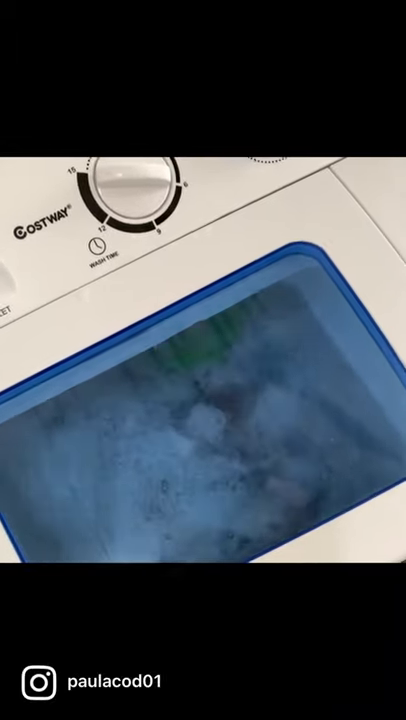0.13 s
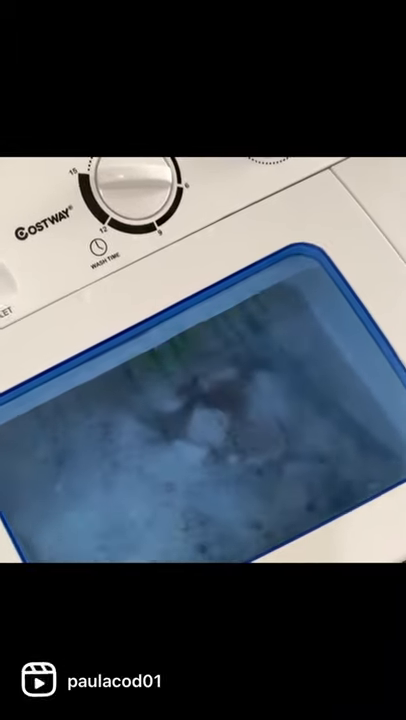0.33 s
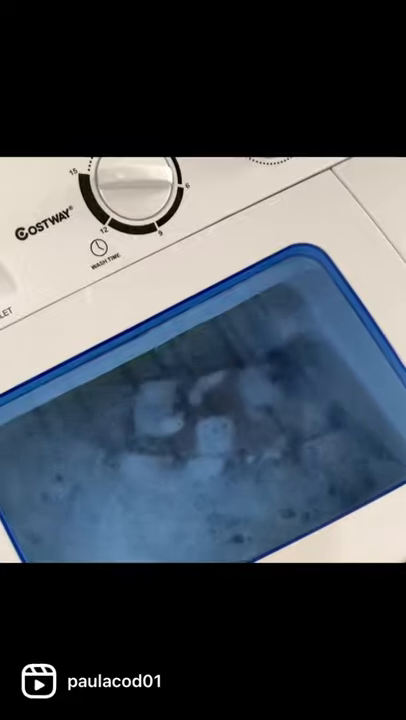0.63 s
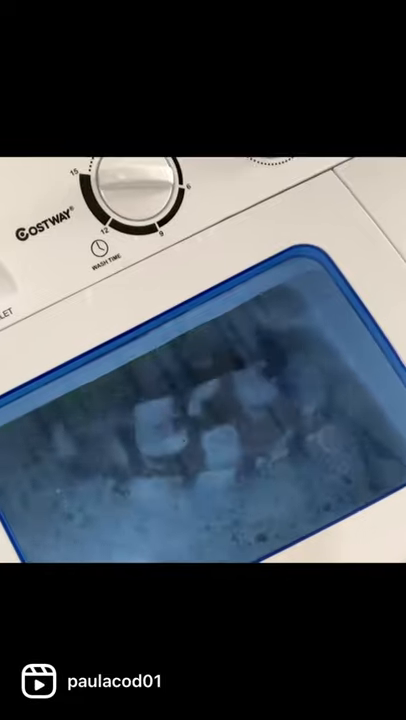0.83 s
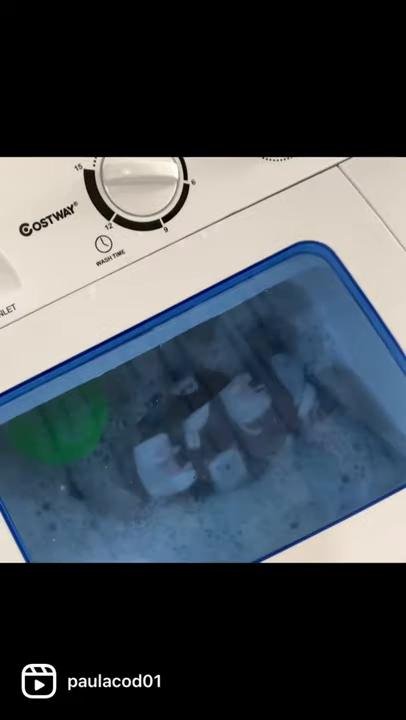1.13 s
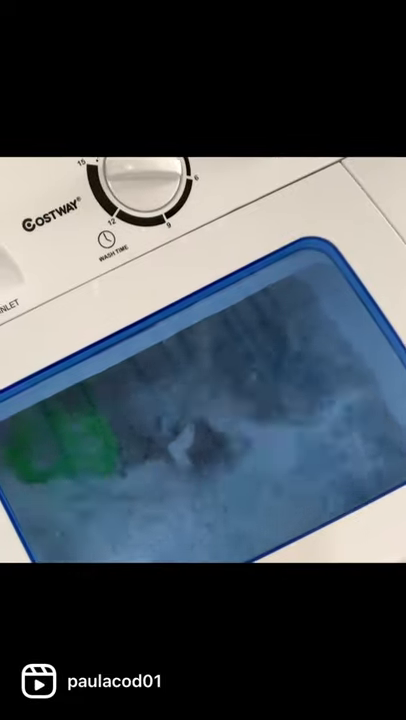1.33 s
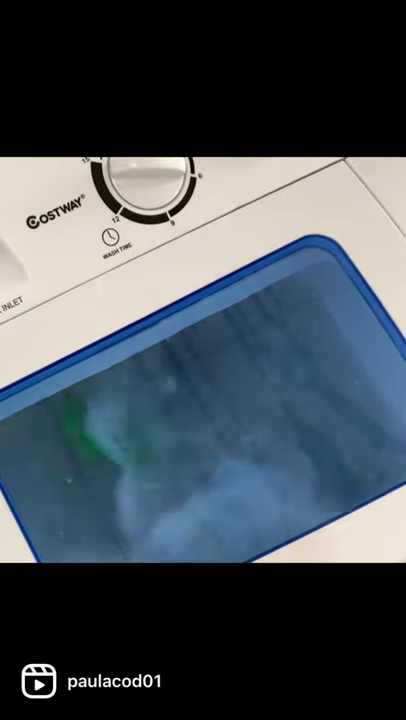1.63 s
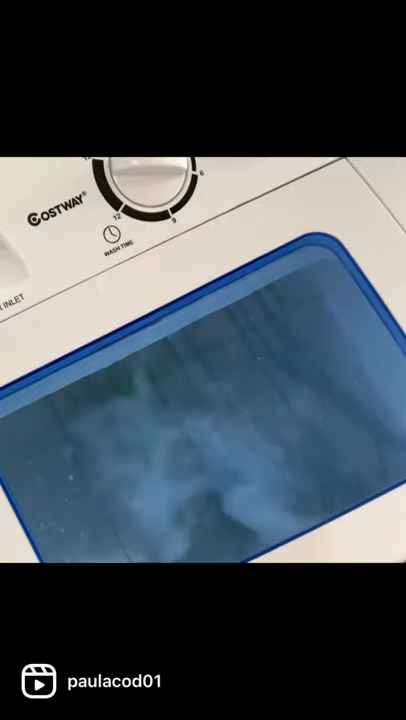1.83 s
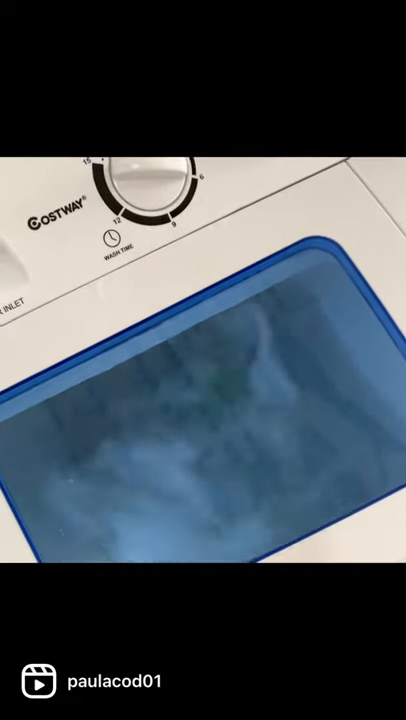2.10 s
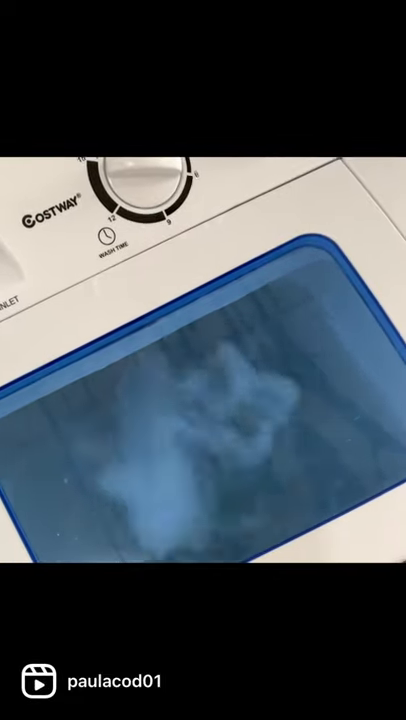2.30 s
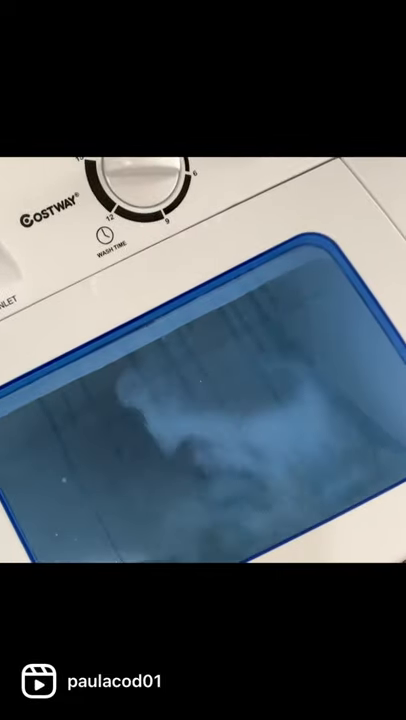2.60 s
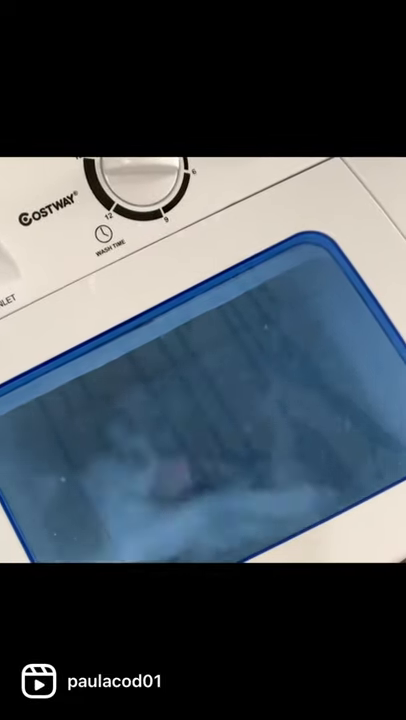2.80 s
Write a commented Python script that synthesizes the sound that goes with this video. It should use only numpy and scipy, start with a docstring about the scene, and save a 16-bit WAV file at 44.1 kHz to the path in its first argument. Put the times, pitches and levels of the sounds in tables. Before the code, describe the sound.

A small plastic washing machine: its timer ticks rapidly over quiet water, a switch snaps, the motor spins up into a rough low hum, and laundry churns with dull thumps; close stereo microphones in a quiet room.

```python
"""A small plastic washing machine heard from just above its lid, in a quiet room, by two close microphones.
At first the clockwork timer ticks over idle water and a few bubbles and drops. At 0.68 s its switch snaps
and the motor spins up: mains hum, rough shaft tones and cabinet rumble. Then water churns and sprays as
filtered noise, laundry bumps the tub's decaying modes, and drops and rising bubble tones thicken late,
with a second snap at 2.66 s."""
import sys
import numpy as np
from scipy import signal
from scipy.fft import rfft, irfft
from scipy.io import wavfile
from scipy.ndimage import uniform_filter1d

SR = 44100
rng = np.random.default_rng(int(sys.argv[2]) if len(sys.argv) > 2 else 0)


def dump_mix(stems):
    """Bounce the given channels to the path in sys.argv[1] as a 16-bit WAV at rate SR."""
    frames = np.atleast_2d(stems).T  # one column per channel
    limited = np.clip(frames, -1, 1)  # hard clip at full scale
    pcm = np.round(limited * 32767).astype(np.int16)
    wavfile.write(sys.argv[1], SR, pcm)


N = 130095
SWITCH_ON_S = .68


def undb(db):
    """Decibel law: amplitude gain of a level in dB."""
    return 10 ** (np.asarray(db) / 20)


def level(x, db):
    """Root-mean-square normalisation: scale to an rms level in dB."""
    return x * undb(db) / np.sqrt(np.mean(x ** 2))


def curve(table):
    """Linear interpolation in time: a (time [s], value) table at every sample."""
    return np.interp(np.arange(N) / SR, *np.array(table).T)


def over_hz(table, hz):
    """Interpolation on a logarithmic frequency axis: a (frequency [Hz], value) table."""
    table_hz, values = np.array(table).T
    return np.interp(np.log(hz + 1), np.log(table_hz), values)


def walk(rate):
    """Smoothed random modulation: values held 1 / rate s and slewed twice; spread near 1."""
    hold = int(SR / rate)
    steps = np.repeat(rng.standard_normal(N // hold + 1), hold)
    return 1.25 * uniform_filter1d(uniform_filter1d(steps, hold), hold)[:N]


# likeness of the two microphones: (frequency [Hz], likeness [0-1])
MIC_LIKENESS = [(100, .92), (220, .94), (400, .6), (1400, .2), (6500, .3), (7800, .88), (16000, .86)]
# left minus right: (frequency [Hz], level difference [dB])
MIC_TILT = [(30, -2), (60, -1), (130, -2.5), (250, 1.5), (550, 2), (1500, 2.5), (3000, 0.5), (5500, -1),
            (7500, -1)]
# phase by which the left microphone leads: (frequency [Hz], lead [cycles])
MIC_LEFT_LEAD = [(500, 0), (1000, .2), (2000, .5), (3500, .85), (4200, 1), (6500, 1), (8300, .5),
                 (11000, 0), (13400, -.5), (15400, -1)]


def ports(x, other):
    """Partial coherence: two microphones share x by likeness and 'other' fills the rest."""
    hz = np.arange(N // 2 + 1) * SR / N
    like = np.clip(over_hz(MIC_LIKENESS, hz), 0, 1)
    mid = rfft(x) * np.sqrt((1 + like) / 2)
    side = rfft(other) * np.sqrt((1 - like) / 2)
    # half the level and phase difference goes to each side
    lead = np.interp(hz, *np.array(MIC_LEFT_LEAD).T)
    left = undb(over_hz(MIC_TILT, hz) / 2) * np.exp(1j * np.pi * lead)
    return np.array([irfft((mid + side) * left, N), irfft((mid - side) / left, N)])


def wash(colour, source, flicker_db, rate):
    """Subtractive synthesis: two sources coloured, half-octave bands flickering partly alone; rms 1."""
    hz = np.arange(N // 2 + 1) * SR / N
    low, high = colour[0][0], colour[-1][0]
    inside = (hz > low) & (hz < high)
    both = rfft(source) * undb(over_hz(colour, hz)) * inside
    place = 2 * np.log2(hz + 1)  # in half octaves
    together = walk(rate)
    out = 0
    for k in range(int(2 * np.log2(low)), int(2 * np.log2(high)) + 2):
        share = np.sqrt(np.clip(1 - abs(place - k), 0, 1))
        flicker = undb(flicker_db * (walk(rate) + 1.43 * together))
        out = out + irfft(both * share, N) * flicker
    return level(ports(*out), 0)


def ring(modes, push):
    """Modal synthesis: decaying modes, t60 at most 0.12 s, driven by a push; peak 1."""
    t = np.arange(SR // 5) / SR
    response = 0
    for hz, db, t60 in modes:
        response = response + undb(db) * np.sin(2 * np.pi * hz * t) * 1000. ** (-t / min(t60, .12))
    x = signal.fftconvolve(response, push)
    return x / abs(x).max()


def add(out, x, s):
    """Superposition: mix a sound in at s seconds."""
    i = int(s * SR)
    if 0 <= i < N:
        out[i:i + len(x)] += x[:N - i]


# mains hum: (multiple of the base tone, rms level once built up [dB])
HUM_TONES = [(1, -30), (2, -39.5), (3, -46)]
HUM_HZ = 120.07
HUM_WAVER_DB = .38  # times the multiple
HUM_RISE_S, HUM_LATE_SHARE, HUM_LATE_S = .04, .7, .13


def mains_hum():
    """Harmonic series: a fixed base tone and multiples; a share of the hum builds up late."""
    t = np.arange(N) / SR
    since_on = np.clip(t - SWITCH_ON_S, 0, 9)
    hum = 0
    for k, db in HUM_TONES:
        gain = undb(db + HUM_WAVER_DB * k * walk(22))
        hum = hum + gain * np.sin(2 * np.pi * (k * HUM_HZ * t + rng.random()))
    rise = 1 - np.exp(-(since_on / HUM_RISE_S) ** 2 / 2)
    late = 1 - HUM_LATE_SHARE * np.exp(-since_on / HUM_LATE_S)
    return np.sqrt(2) * hum * rise * late


# shaft tones: (multiple of shaft speed, rms level before the load [dB])
SHAFT_TONES = [(6, -40), (7, -39), (8, -35.5), (9, -45), (10, -43), (12, -46.5), (18, -54.5)]
SHAFT_HZ, SPIN_UP_S = 28.05, .07  # running speed, time constant of spin-up
SHAFT_DRIFT = .003  # fraction of speed
SHAFT_ROUGH_DB, SHAFT_ROUGH_PER_S = 4, 24


def shaft_tones():
    """Rotational orders: tones locked to a shaft that spins up exponentially, rough in level and phase."""
    since_on = np.clip(np.arange(N) / SR - SWITCH_ON_S, 0, 9)
    speed = SHAFT_HZ * (1 - np.exp(-since_on / SPIN_UP_S)) * (1 + SHAFT_DRIFT * walk(2.97))
    turn = 2 * np.pi * np.cumsum(speed) / SR
    tones = 0
    for k, db in SHAFT_TONES:
        gain = undb(db + SHAFT_ROUGH_DB * walk(SHAFT_ROUGH_PER_S))
        tones = tones + gain * np.sin(k * turn + 0.76 * walk(16) + 7 * rng.random())
    return np.sqrt(2) * tones


# cabinet rumble: (frequency [Hz], relative level [dB per Hz])
RUMBLE_COLOUR = [(40, -17.5), (60, -29), (90, -9.5), (125, -6), (155, -7), (170, -2.5), (185, -4),
                 (230, -4), (310, -8.5), (445, -18), (515, -12.5), (700, -36)]
RUMBLE_DB = -31  # before the growl and the load
GROWL_DB, GROWL_PEAK_S, GROWL_WIDTH_S = 5.5, .812, .16


def cabinet_rumble():
    """Resonant filtering: noise in the cabinet's colour, growling as the motor strains at the start."""
    t = np.arange(N) / SR
    growl_db = GROWL_DB * np.exp(-((t - GROWL_PEAK_S) / GROWL_WIDTH_S) ** 2)
    return undb(RUMBLE_DB + growl_db) * wash(RUMBLE_COLOUR, rng.standard_normal((2, N)), 1.5, 7.91)


# motor load after switch-on: (time [s], level [dB])
MOTOR_LOAD = [(.68, -42), (.72, -14.5), (.78, -7), (.86, -2.5), (.96, 0), (1.25, 0.5), (1.5, -0.5),
              (1.65, -0.5), (2.0, -1), (2.3, -0.5), (2.6, -2.5), (2.95, 3)]


def motor():
    """Amplitude modulation by load: it scales shaft tones and rumble, while the hum stands apart."""
    load = undb(curve(MOTOR_LOAD))
    tones = mains_hum() + shaft_tones() * load
    running = np.arange(N) / SR > SWITCH_ON_S
    return (ports(tones, np.roll(tones, 90)) + cabinet_rumble() * load) * running


# colour of churning water: (frequency [Hz], relative level [dB per Hz])
CHURN_COLOUR = [(260, -33), (450, -10), (511, -9), (673, -14.5), (746, -5), (2800, -16), (3150, -22),
                (4600, -26), (7000, -38.5), (9100, -69), (15400, -120)]
# churning: (time [s], level [dB])
CHURN_LEVELS = [(0.7, -51), (.82, -46), (0.93, -41), (1.1, -43), (1.56, -44.5), (1.66, -41.5), (1.76, -47),
                (1.82, -42.5), (1.9, -44), (2.05, -50), (2.09, -40.5), (2.31, -44), (2.48, -40),
                (2.55, -44), (2.68, -41), (2.95, -42)]


def churn():
    """Turbulence noise: coloured, flickering noise that swells with the churning."""
    return wash(CHURN_COLOUR, rng.standard_normal((2, N)), 1.2, 29.94) * undb(curve(CHURN_LEVELS))


# colour of the spray: (frequency [Hz], relative level [dB per Hz])
SPRAY_COLOUR = [(2500, -18.5), (4500, 5.5), (7000, -0.5), (10000, -0.5), (13000, 0), (14500, -11.5),
                (16000, -27.5)]
# spray: (time [s], level [dB])
SPRAY_LEVELS = [(0.75, -74.5), (0.87, -64.5), (1.1, -64.5), (1.41, -77), (2.07, -65), (2.24, -65),
                (2.47, -58.5), (2.63, -58), (2.81, -53), (2.95, -57.5)]
GRAINS_PER_S, GRAIN_SPREAD_DB = 900, 4


def spray():
    """Shot noise: hiss made grainy by random brief swells over a steady part."""
    size = undb(GRAIN_SPREAD_DB * np.minimum(rng.exponential(size=N), 3))
    grains = (rng.random(N) < GRAINS_PER_S / SR) * size
    grains = uniform_filter1d(grains, size=40)
    fizz = rng.standard_normal((2, N)) * (grains / grains.std() + 1.3)
    return wash(SPRAY_COLOUR, fizz, 0.72, 5.7) * undb(curve(SPRAY_LEVELS))


BURBLE_PER_S, BURBLE_LOW_HZ, BURBLE_HIGH_HZ = 140, 540.8, 4680  # starting pitches
BURBLE_CYCLES = 15.1  # amplitude decays by exp(-2) in this many
BURBLE_DB, BURBLE_IDLE_DB = -8.5, -58  # against the churn; always present


def burble():
    """Bubble resonance: many small rising, fading tones at random, the low ones louder; rms 1."""
    out, t = np.zeros(N), np.arange(SR // 12) / SR
    for s, place, size in rng.random((int(BURBLE_PER_S * N / SR), 3)):
        hz = BURBLE_LOW_HZ * (BURBLE_HIGH_HZ / BURBLE_LOW_HZ) ** place
        fade = t * hz / BURBLE_CYCLES
        tone = np.sin(2 * np.pi * hz * t * (1 + 0.047 * fade))
        envelope = np.minimum(t * hz / 2, 1) * np.exp(-2 * fade)
        add(out, size ** 2 / hz * tone * envelope, s * N / SR)
    return level(ports(out, np.roll(out, 70)), 0)


def water():
    """Superposition of water sounds: idle lapping and faint burble, then churn, spray and more burble."""
    on = np.clip((np.arange(N) / SR - SWITCH_ON_S) / 0.038, 0, 1)
    burble_gain = undb(BURBLE_IDLE_DB) + on * undb(curve(CHURN_LEVELS) + BURBLE_DB)
    return idle() + on * (churn() + spray()) + burble() * burble_gain


# laundry bumping the tub: (time [s], peak level [dB])
TUB_BUMPS = [(0.931, -17), (1.185, -24.5), (1.221, -19.5), (1.61, -17.5), (2.242, -23), (2.54, -19),
             (2.864, -21)]
# ring of the tub: (frequency [Hz], level [dB], t60 [s])
TUB_MODES = [(130, -6.5, 0.3), (158.7, -2.5, 0.19), (221.2, 7, 0.27), (317, 2, .07), (369, -12, 0.017)]


def bumps():
    """Impact excitation: a smooth brief push sets the tub's modes ringing."""
    out = np.zeros(N)
    for s, db in TUB_BUMPS:
        add(out, undb(db) * ring(TUB_MODES, np.diff(np.hanning(300), n=2)), s)
    return out


# drops and slaps of water: (time [s], nominal level [dB], centre frequency [Hz])
WATER_DROPS = [(0.341, -48, 900), (.93, -34, 890), (1.62, -53, 8070), (1.712, -44, 8040),
               (2.038, -49, 10400), (2.09, -44, 1510), (2.18, -40, 10200), (2.446, -30, 1300),
               (2.465, -43, 6000), (2.496, -29, 900), (2.61, -42, 4000), (2.629, -40, 5500),
               (2.626, -44, 10500), (2.643, -42, 10100), (2.714, -45, 11500), (2.758, -36, 2200),
               (2.821, -46, 11000), (2.916, -46, 5000)]
DROP_T60_S, DROP_WIDTH = .06, .45  # t60 before a pitch-dependent part; band as a fraction of centre


def drops():
    """Band-limited impact noise: short hissing taps, the low ones fading more slowly."""
    out, t = np.zeros(N), np.arange(SR // 8) / SR
    for s, db, hz in WATER_DROPS:
        edges = [hz * (1 - DROP_WIDTH / 2), hz * (1 + DROP_WIDTH / 2)]
        band = signal.butter(2, edges, "band", fs=SR, output="sos")
        tap = level(signal.sosfilt(band, rng.standard_normal(len(t))), db - 5)
        envelope = (1 - np.exp(-t / 0.00065)) * 1000. ** (-t / (DROP_T60_S + 40 / hz))
        add(out, tap * envelope, s)
    return out


# single bubbles: (time [s], level before the envelope [dB], starting pitch [Hz])
SINGLE_BUBBLES = [(.19, -35.5, 834), (.27, -33.5, 690), (.42, -34, 512), (.988, -29, 550),
                  (1.61, -23, 1100), (1.69, -38, 1130), (2.323, -23, 589), (2.861, -22, 4460)]
BUBBLE_CYCLES, BUBBLE_RISE = 45, .08  # cycles to fall 60 dB; phase advance over them, as a fraction


def bubbles():
    """Bubble resonance: fading tones that rise in pitch."""
    out, t = np.zeros(N), np.arange(SR // 8) / SR
    for s, db, hz in SINGLE_BUBBLES:
        fade = t * hz / BUBBLE_CYCLES
        tone = np.sin(2 * np.pi * hz * t * (1 + BUBBLE_RISE * fade))
        add(out, undb(db) * tone * (1 - np.exp(-t / 0.0024)) * 1000. ** -fade, s)
    return out


# switch snaps: (time [s], peak level [dB])
SWITCH_SNAPS = [(.678, -26), (2.664, -24)]
# ring of the switch housing: (frequency [Hz], level [dB], t60 [s])
SWITCH_MODES = [(2400, -8, .004), (3300, -12, .003), (3840, -5, .009), (4400, -3, .006), (5900, -8, .003),
                (7100, -8, .003), (9600, -2, .004), (11300, -4, .003), (12600, -6, .003),
                (15400, -20, .003)]
SNAP_RATTLE_S, SNAP_TAIL_DB, SNAP_TAIL_S = .0035, -18, .2  # tail is a t60


def switch():
    """Noise-driven resonance: a brief rattle with a weak tail rings the housing."""
    out, t = np.zeros(N), np.arange(SR // 5) / SR
    rattle = t / SNAP_RATTLE_S * np.exp(-t / SNAP_RATTLE_S)
    tail = undb(SNAP_TAIL_DB) * 1000. ** (-t / SNAP_TAIL_S)
    for s, db in SWITCH_SNAPS:
        push = rng.standard_normal(len(t)) * (rattle + tail)
        add(out, undb(db) * ring(SWITCH_MODES, push), s)
    return out


# timer clockwork: (time [s], beats counted [count]); each beat is a tick and a tock
TIMER_BEATS = [(-.0072, -1), (.0505, 0), (.28, 4), (.5122, 8), (.6266, 10), (1.0184, 17), (1.294, 22),
               (1.7417, 30), (1.9026, 33), (1.956, 34), (2.2386, 39), (2.461, 43), (2.5746, 45), (2.85, 50),
               (2.961, 52)]
# ring of the clockwork at a tick: (frequency [Hz], level [dB], t60 [s])
TICK_MODES = [(2400, -6, 0.0044), (5530, -6, 0.0015), (7200, -12, .002), (10060, 1, 0.0031),
              (12920, 1, 0.0064)]
# ring of the clockwork at a tock: (frequency [Hz], level [dB], t60 [s])
TOCK_MODES = [(2440, -2, 0.0045), (3330, -5, 0.0049), (3797, -16, 0.06), (4300, -7, 0.0039),
              (8100, -19.5, 0.0007), (13000, -3.5, 0.0057)]
TICK_DB, TOCK_DB, TICK_SCATTER_DB = -54.5, -50.5, 3.5  # mean peaks and their spread
TOCK_LATE_S, TICK_S = .0305, .005  # mean delay of the tock; decay constant of the push


def timer():
    """Escapement impacts: noise bursts ring one set of modes at each tick, another at each tock."""
    out, t = np.zeros(N), np.arange(900) / SR
    strokes = ((0, TICK_DB, .0004, TICK_MODES), (TOCK_LATE_S, TOCK_DB, .002, TOCK_MODES))
    when, count = np.array(TIMER_BEATS).T
    for s in np.interp(np.arange(count[0], count[-1]), count, when):
        for late, db, jitter, modes in strokes:
            push = rng.standard_normal(900) * np.exp(-t / TICK_S)
            gain = undb(db + TICK_SCATTER_DB * rng.standard_normal())
            add(out, ring(modes, push) * gain, s + late + jitter * rng.standard_normal())
    return out


# idle water and room: (frequency [Hz], relative level [dB per Hz])
IDLE_COLOUR = [(18, -41.5), (36, -28), (50, 0), (70, -11), (110, -10.5), (195, 0.5), (300, -5.5),
               (400, -8.5), (720, -12), (960, -18.5), (2000, -28.5), (3600, -39.5), (3840, -31),
               (4100, -38.5), (5000, -49), (7000, -49), (9500, -61.5), (13000, -40.5), (14500, -57),
               (16000, -61.5)]
IDLE_DB = -44


def idle():
    """Stationary noise: idle water and room as coloured noise throughout, flickering slightly."""
    return undb(IDLE_DB) * wash(IDLE_COLOUR, rng.standard_normal((2, N)), 0.49, 14.9)


ROOM_T60_S, ROOM_DB = .14, -11


def room(hits):
    """Diffuse reverberation: hits convolved with two unrelated exponentially decaying noises."""
    t = np.arange(SR // 3) / SR
    tails = rng.standard_normal((2, len(t))) * 1000. ** (-t / ROOM_T60_S)
    wet = []
    for tail in tails:
        unit_tail = tail / np.sqrt(np.sum(tail ** 2))
        wet.append(signal.fftconvolve(hits, unit_tail)[:N] * undb(ROOM_DB))
    return ports(hits + wet[0], np.roll(hits, 31) + wet[1])


def scene():
    """Superposition: hits get a short room tail; motor and water are added without one."""
    hits = timer() + switch() + drops() + bubbles() + bumps()
    return motor() + water() + room(hits)


def record(dry):
    """Band limiting: the recorder cuts the top with a steep elliptic low-pass at 15.8 kHz."""
    return signal.sosfilt(signal.ellip(10, .2, 80, 15800, fs=SR, output="sos"), dry)


dry = scene()
out = record(dry)
dump_mix(out)
```